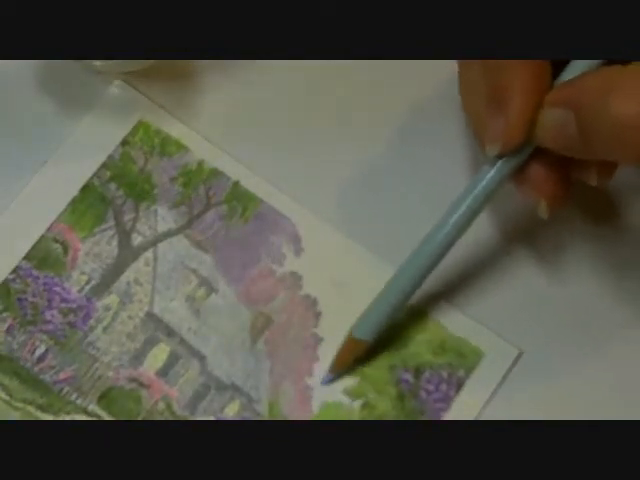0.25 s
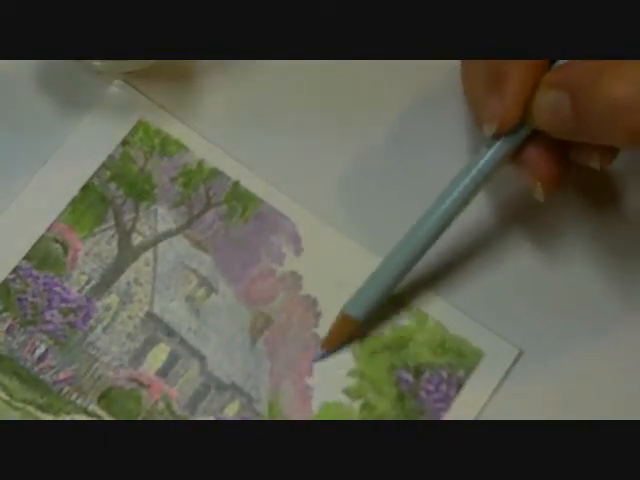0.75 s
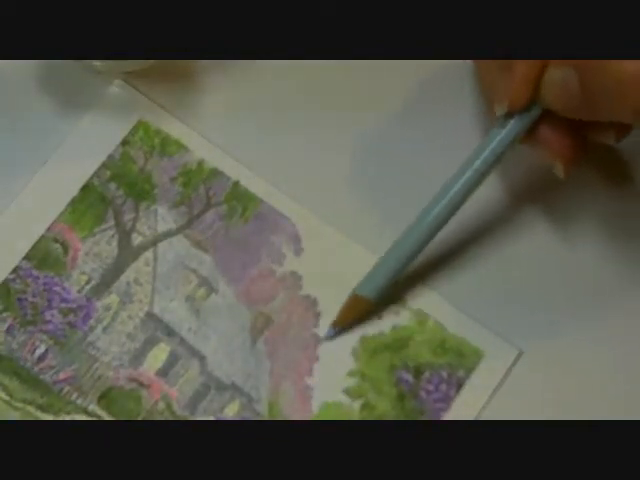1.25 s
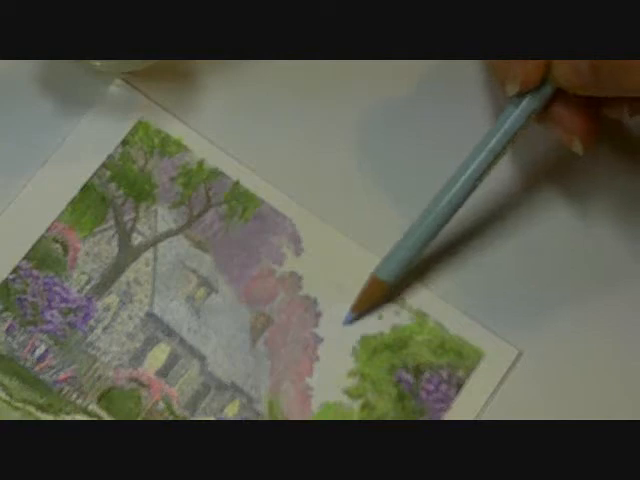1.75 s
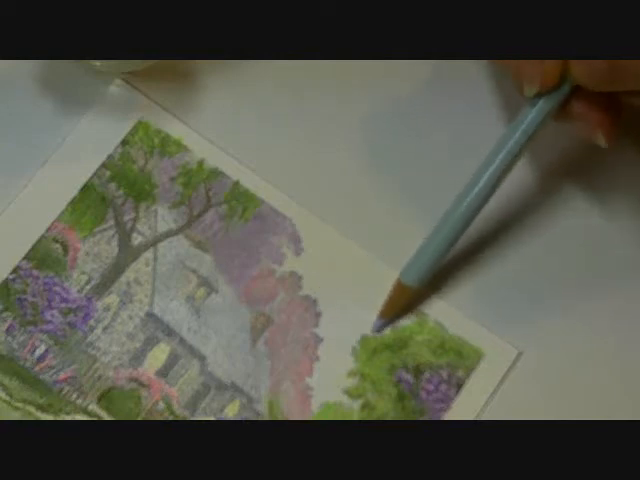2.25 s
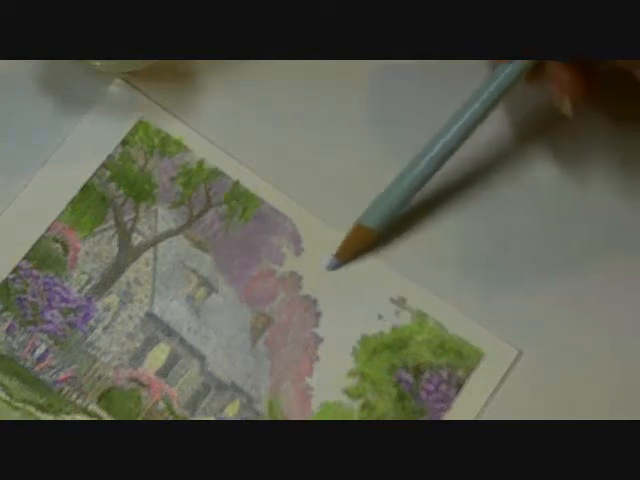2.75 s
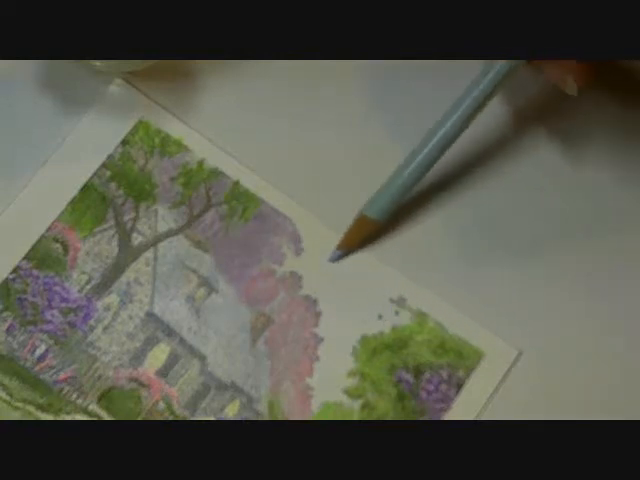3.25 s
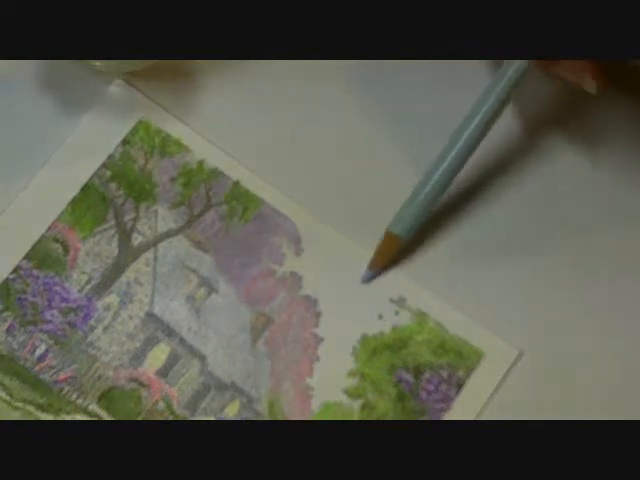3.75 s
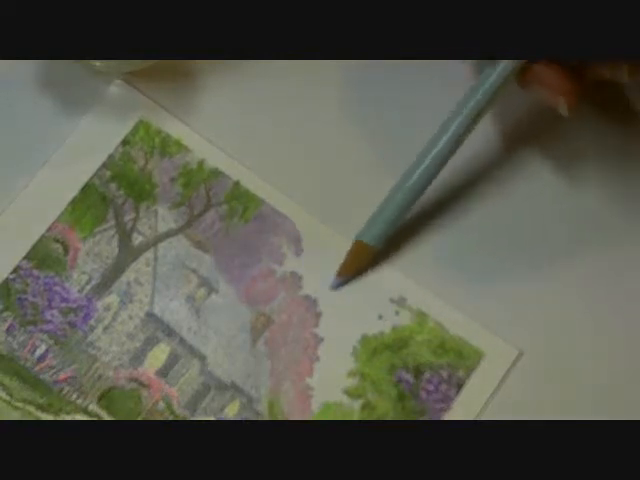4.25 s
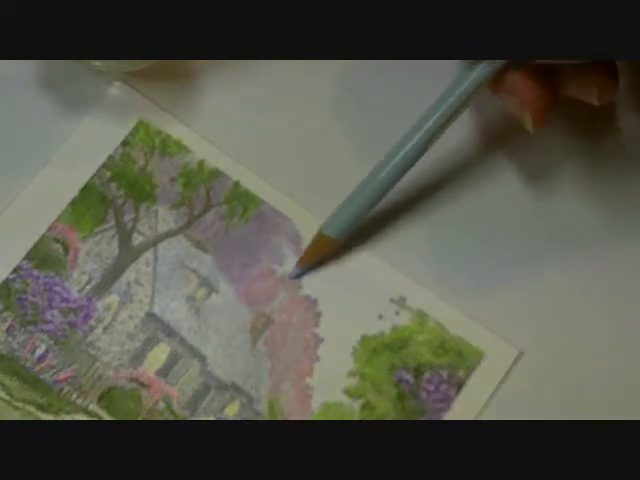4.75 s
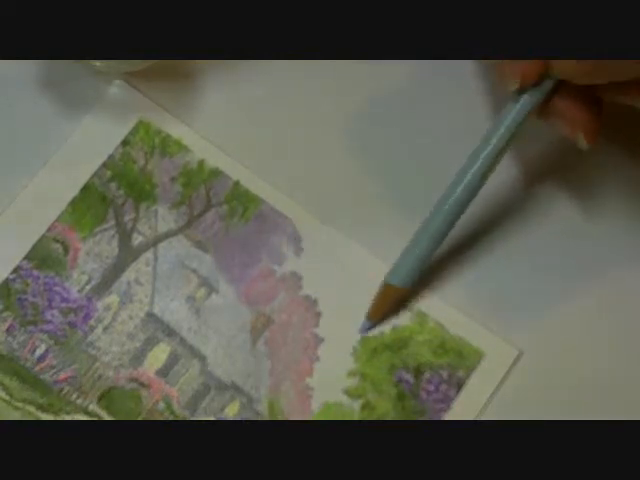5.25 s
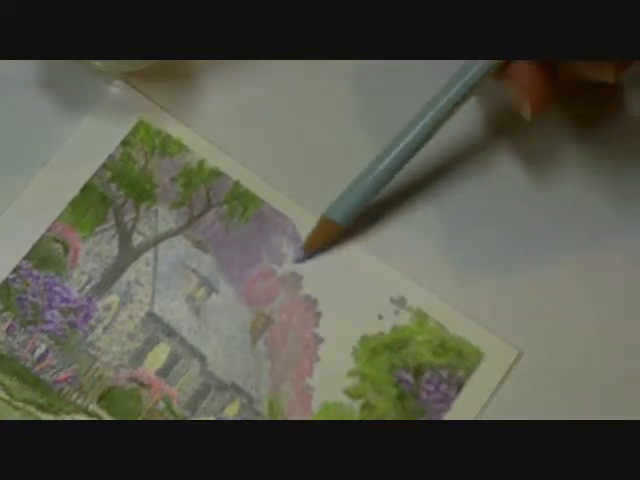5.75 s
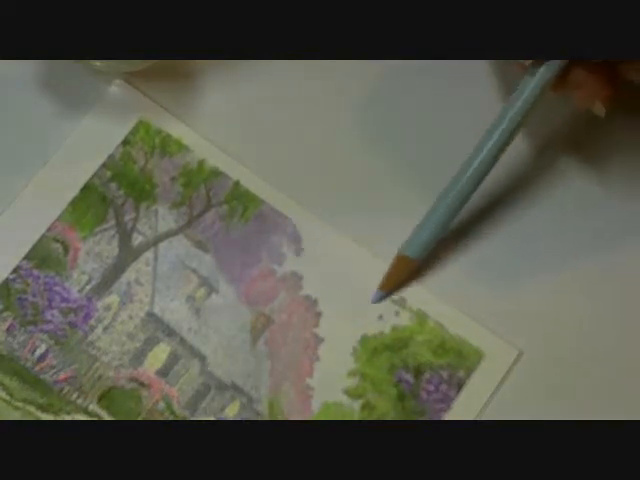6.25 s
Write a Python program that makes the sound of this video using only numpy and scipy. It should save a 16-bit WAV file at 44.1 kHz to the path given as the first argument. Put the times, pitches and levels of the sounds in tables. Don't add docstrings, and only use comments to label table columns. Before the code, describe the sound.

In a quiet room at a desk, rapid pencil strokes make a continuous bright scritch-scratch, pushes starting abruptly and pulls easing in. The rub grows slightly stronger after three seconds, briefly stumbles near five, then carries on steadily. Behind it are faint clock ticks, a single muffled wooden knock with a humming tail, occasional grit clicks, gentle hiss and a barely audible thin whine.

```python
import sys
import numpy as np
from scipy import signal
from scipy.fft import rfft, irfft
from scipy.io import wavfile

SR = 44100
rng = np.random.default_rng(int(sys.argv[2]) if len(sys.argv) > 2 else 0)


def master(y):
    cut = np.clip(np.atleast_2d(y).T, -1, 1)
    pcm = np.round(cut * 32767)
    wavfile.write(sys.argv[1], SR, pcm.astype(np.int16))


def magnitude_from_level(level_db):
    exponent = np.asarray(level_db, float) / 20
    return 10 ** exponent


N = 286209


def rms_one(x):
    return x / np.sqrt(np.mean(x ** 2) + 1e-20)


def drift(rate_hz):
    r = np.exp(-2 * np.pi * rate_hz / SR)
    settle = 4000
    return rms_one(signal.lfilter([1], [1, -2 * r, r * r], rng.standard_normal(N + settle))[settle:])


def resonate(x, modes):
    out = 0
    for k, (hz, width, db) in enumerate(modes):
        r = np.exp(-np.pi * width / SR)
        b = (1 - r * r) / 2 * np.array([1, 0, -1])
        a = [1, -2 * r * np.cos(2 * np.pi * hz / SR), r * r]
        out = out + (-1) ** k * magnitude_from_level(db) * signal.lfilter(b, a, x)
    return out


def burst(start_s, db, t60, rise):
    age = np.maximum(np.arange(N) / SR - start_s, 0)
    return magnitude_from_level(db - 60 * age / t60) * (1 - np.exp(-age / rise)) * rng.standard_normal(N)


def click(start_s, db):
    return magnitude_from_level(db) * (np.arange(N) == round(start_s * SR))


# (f/Hz, level/dB per Hz)
NOISE_SHAPE = [(15, -50), (30, -24), (203, -2.5), (303, -1), (3210, -13), (4310, -14), (5200, -13),
               (6620, -14), (7370, -15.5), (8650, -13), (10200, -11.5), (12900, -13), (15200, -18)]
# (f/Hz, width/Hz, level/dB)
DUCT_HUMP = (940, 145, 1.96)


def room_noise():
    hz = np.maximum(np.fft.rfftfreq(N, 1 / SR), 1)
    shape_hz, shape_db = np.transpose(NOISE_SHAPE)
    duct_hz, duct_width, duct_db = DUCT_HUMP
    level_db = np.interp(np.log(hz), np.log(shape_hz), shape_db)
    level_db = level_db + duct_db * np.exp(-((hz - duct_hz) / duct_width) ** 2)
    return magnitude_from_level(-56) * rms_one(irfft(rfft(rng.standard_normal(N)) * magnitude_from_level(level_db), N))


# (f/Hz, level/dB)
WHINE_TONE = (4000, -84)


def whine():
    hz, db = WHINE_TONE
    return magnitude_from_level(db + 1.5 * drift(3)) * np.sin(2 * np.pi * hz * np.arange(N) / SR)


# (push t/s, pull t/s, push level/dB, pull level/dB, lingering at the turns/ms)
EARLY_SWINGS = [(.014, 0.105, -48.5, -50, 5), (.199, 0.285, -49, -47.9, 2), (0.386, 0.47, -46.5, -47, 7),
                (0.562, 0.645, -48.5, -48, 5), (.733, 0.818, -49.5, -49, 3), (0.907, 0.994, -49, -46.5, 5),
                (1.08, 1.17, -48.5, -47, 6), (1.258, 1.347, -51, -49.5, 6), (1.433, 1.517, -50.5, -46.5, 0),
                (1.605, 1.69, -49, -48.5, -2), (1.775, 1.858, -49, -47, 0), (1.952, 2.044, -46, -46.9, 0),
                (2.135, 2.234, -46.5, -48.5, 2), (2.336, 2.43, -47, -47.5, -1),
                (2.526, 2.619, -46.5, -45.5, -2), (2.711, 2.803, -45.5, -47, -2.5),
                (2.896, 2.98, -46.5, -48, -5), (3.069, 3.159, -49, -48.5, -3)]
LATE_SWINGS = [(3.263, 3.347, -48.5, -44.8, 2), (3.445, 3.537, -46, -48, 2),
               (3.627, 3.72, -46.5, -46.5, -1), (3.808, 3.902, -43.5, -44, 3.5),
               (3.985, 4.078, -46.5, -45, 3), (4.162, 4.253, -45, -43.5, 4), (4.335, 4.425, -43.5, -44, 8),
               (4.506, 4.588, -46.5, -45, 2), (4.668, 4.738, -45, -47, 8), (4.826, 4.883, -49, -50.5, 8),
               (4.961, 5.051, -46.5, -47, -5), (5.134, 5.234, -45.5, -48.5, -7),
               (5.327, 5.431, -47, -45, -2), (5.523, 5.614, -45.5, -46, -5), (5.71, 5.813, -47, -47, -3),
               (5.905, 6.003, -46, -45.5, -3), (6.101, 6.201, -45.5, -45, -1), (6.299, 6.398, -45, -47, -1)]
# (t/s, lean of the pencil, extra lean on the push, place on the sheet, reach of push beyond pull)
HAND_POSE = [(0, -.2, -.3, 2.5, .4), (.45, .2, .1, 3, .6), (.62, 1.2, .5, 1, .3), (1.2, 1.1, 0.36, 0.5, .2),
             (1.75, 0.91, .4, .2, -.6), (2.3, 0.94, .05, -0.2, -.2), (2.75, 1.4, 0.65, -0.8, -0.29),
             (3.2, .8, .05, -.5, -1.6), (3.75, .7, -.3, -.5, -.7), (4.35, 0.39, 0, 0.5, -.5),
             (4.7, -1.1, .05, 0, -0.33), (4.95, -1.3, .6, 1, -.2), (5.3, 0.5, .4, -.4, -0.55),
             (5.8, 0.53, .15, -1.1, -.8), (6.45, .6, -.3, -.3, .5)]
MOVING = (0.76, 0.69)
SWELL = (-1.2, 0.94)
RISE = (.0012, .0042)
LINGER = (1.3, 0.77)


def strokes():
    rows = np.array(EARLY_SWINGS + LATE_SWINGS)
    start = rows[:, :2].ravel()
    db = rows[:, 2:4].ravel()
    way = np.arange(len(start)) % 2
    side = 1 - 2 * way
    linger = np.outer(rows[:, -1], LINGER).ravel() / 1000
    beat = np.diff(start, append=6.498)
    length = beat * np.take(MOVING, way) - linger
    pose_s, *pose = np.transpose(HAND_POSE)
    lean, tip, place, reach = (np.interp(start + length / 2, pose_s, column) for column in pose)
    lean = lean + tip * side - 0.3 * (db + 46.5)
    place = place + reach * side
    return np.transpose([start, length, db, np.take(SWELL, way), lean, place, np.take(RISE, way)])


def friction(fall, lag_db, lag_s):
    t, gain = np.arange(N) / SR, np.zeros(N)
    for start, length, db, swell_db, lean, place, rise in strokes():
        near = slice(max(0, int((start - .06) * SR)), int((start + length + .08) * SR))
        age = t[near] - start
        gate = 1 / (1 + np.exp(-age / rise)) / (1 + np.exp((age - length) / fall))
        part = np.clip(age / length, 0, 1)
        arch = -9.0 * (part - .45) ** 2
        lag = lag_db * np.exp(-np.maximum(age, 0) / lag_s)
        gain[near] += gate * magnitude_from_level(db + arch + lag + 2 * swell_db * (part - .5))
    return gain


def slips(per_s, spread_db):
    sizes = magnitude_from_level(spread_db * np.minimum(rng.exponential(1, N), 4)) * rng.choice([-1, 1], N)
    return rms_one(sizes * (rng.random(N) < per_s / SR))


# (t/s, grip)
FINGER_GRIP = [(0.0, 1.7), (0.4, 1.5), (0.8, 0.29), (1.2, -1.3), (1.6, -1.1), (2.0, -0.044), (2.4, -0.042),
               (2.8, 0.94), (3.2, 0.1), (3.6, 0.012), (4.0, 0.15), (4.4, -0.94), (4.8, -0.9), (5.2, 0.029),
               (5.6, -0.47), (6.0, 0.71), (6.4, 0.3)]
# (f/Hz, level/dB per unit lean, per unit place, per unit grip)
MODE_COUPLING = [(4350, 3.2, -0.1, -1.5), (4850, 1.1, 0.3, -0.3), (5450, 1.8, 0.9, -0.7),
                 (5890, -1.5, -2.2, 0.3), (6250, 2.3, 0.4, -1.5), (7050, 0.7, -2.6, -0.7),
                 (7520, 0.9, -0.3, 0.2), (8150, 4.0, -2.3, -0.9), (8600, 2.1, -0.1, 1.1),
                 (9100, 2.1, 0.5, 1.6), (9550, -0.1, -0.2, 1.2), (9950, -0.9, -0.7, 1.1),
                 (10250, -0.8, 0.9, -0.1), (10550, 0.1, -0.1, -0.6), (10850, -0.1, -0.6, -0.7),
                 (11300, 1.4, 1.4, -0.1), (11700, 1.5, -0.4, -0.8), (12200, 2.3, 0.1, 1.0),
                 (12700, 2.1, 0.2, 0.6), (13150, 1.7, 1.8, 0.8), (13600, 1.5, 0.0, 2.1),
                 (14200, -0.9, -1.0, 0.5), (14700, -0.9, -2.2, 0.2), (15100, 2.0, -1.7, 1.9)]
# (width/Hz, level/dB)
MODE_RING = [(188, -3), (220, -9.5), (258, -12), (180, 1), (245, -5.5), (238, -3), (296, 6), (265, -1),
             (298, -6), (298, -8), (230, 6), (275, 10), (277, 11), (285, 11), (237, 5.5), (255, 4),
             (338, 5.5), (298, 3.5), (292, 6), (278, 6), (383, 0), (550, -6), (550, -3), (488, -3)]


def pencil():
    step = 64
    coarse = np.arange(0, N + step, step) / SR
    rows = strokes()
    middle = rows[:, 0] + rows[:, 1] / 2
    lean = np.interp(coarse, middle, rows[:, 4])
    place = np.interp(coarse, middle, rows[:, 5])
    grip = np.interp(coarse, *np.transpose(FINGER_GRIP))
    weave_db = -1.5 + 0.84 * drift(250) + 0.94 * drift(40)
    rub = friction(fall=0.0025, lag_db=0.0, lag_s=0.0067) * magnitude_from_level(weave_db)
    trains = [rub * slips(9000, 2.6) for k in range(3)]
    out = 0
    for k, (coupling, (width, db)) in enumerate(zip(MODE_COUPLING, MODE_RING)):
        hz, lean_db, place_db, grip_db = coupling
        wander = np.interp(coarse, np.arange(80) / 12, rng.standard_normal(80))
        posture_db = lean_db * lean + place_db * place + grip_db * grip
        strength = np.repeat(magnitude_from_level(0.6 + posture_db + 1.2 * wander), step)[:N]
        out = out + resonate(trains[k % 3] * strength, [(hz, width, db)])
    return signal.sosfilt(signal.butter(4, 3700, "high", fs=SR, output="sos"), out)


def echoes(x, level_db, t60, count):
    age, out = np.arange(int(.12 * SR)) / SR, x.copy()
    for k in range(count):
        scatter = rng.standard_normal(len(age)) * magnitude_from_level(-60 * age / t60) * (age > .003)
        scatter = scatter / np.linalg.norm(scatter)
        here = np.sqrt(np.clip(1 - abs(np.arange(N) / N * (count - 1) - k), 0, 1))
        out += magnitude_from_level(level_db) * signal.fftconvolve(x * here, scatter)[:N]
    return out


# (t/s, level/dB, case ring relative to the tick/dB)
CLOCK_TICKS = [
    (.862, -59.5, -1),
    (1.86, -63, 1.5),
    (2.865, -58, -5),
    (3.857, -62.5, 2),
    (4.856, -66.5, 6.5),
    (5.858, -60, -2),
]
# (f/Hz, width/Hz, level/dB)
CLOCK_RING = [
    (2780, 135, 8),
    (4740, 260, 7),
]
# (f/Hz, width/Hz, level/dB)
CLOCK_BODY = [
    (1110, 300, 3),
    (1970, 260, 2.5),
    (3270, 1500, -4),
]


def clock():
    hits = rung = 0
    for start_s, db, ring_db in CLOCK_TICKS:
        release = burst(start_s, db + 14.5, 0.069, 0.003)
        tail = burst(start_s, db + 13, 0.3, 0.013)
        stop = burst(start_s + 0.0375, db + 9.5, 0.16, .003)
        hit = release + tail + stop
        hits = hits + hit
        rung = rung + hit * magnitude_from_level(ring_db)
    return resonate(hits, CLOCK_BODY) + resonate(rung, CLOCK_RING)


# (t/s, level/dB, f/Hz)
GRIT_SNAPS = [
    (2.0709, -33.5, 5340),
    (4.0888, -43, 4750),
    (4.1095, -46, 4470),
]


def grit():
    out = 0
    for start_s, db, hz in GRIT_SNAPS:
        crumbs = burst(start_s + 0.0021, db + 5.5, 0.017, .0003)
        hit = click(start_s, db + 25.0) + crumbs
        out = out + resonate(resonate(hit, [(hz, 2400, 0)]), [(hz * 1.01, 3600, 0)])
    return out


# (t/s, level/dB)
FAR_KNOCK = (2.294, -40)
# (f/Hz, width/Hz, level/dB)
WOOD_BODY = [
    (280, 100, 0),
    (560, 120, 3),
    (1070, 220, -2),
    (1550, 470, -6),
]
# (f/Hz, width/Hz, level/dB)
ROOM_TAIL = [
    (297, 74, 0),
    (766, 160, -10),
    (1530, 670, -6),
]


def knock():
    start_s, db = FAR_KNOCK
    blow = resonate(click(start_s, db + 31.0) + burst(start_s, db + 1, .03, .001), WOOD_BODY)
    hum = resonate(burst(start_s, db + 4.5, 2.4, 0.029), ROOM_TAIL[:1])
    tail = resonate(burst(start_s, db + 2.5, 1.0, 0.017), ROOM_TAIL[1:])
    return blow + hum + tail


def scene():
    near = echoes(pencil(), level_db=-8, t60=.085, count=14)
    mono = room_noise() + whine() + near + clock() + grit() + knock()
    return np.array([mono, mono])


def top_cut(x):
    return signal.sosfilt(signal.butter(12, 15690, fs=SR, output="sos"), x)


def record(dry):
    gap_hz, top_hz = 7850, 15260
    gap = signal.butter(1, [gap_hz - 60, gap_hz + 60], "bandstop", fs=SR, output="sos")
    edge = signal.ellip(7, .3, 22, top_hz, fs=SR, output="sos")
    above = signal.cheby2(10, 40, top_hz + 800, fs=SR, output="sos")
    mix = signal.sosfilt(np.vstack([gap, edge, above]), dry)
    return top_cut(mix)


dry = scene()
out = record(dry)
master(out)
```